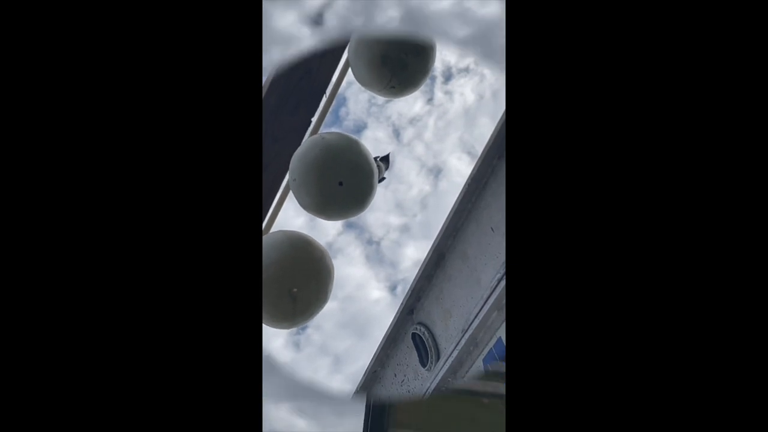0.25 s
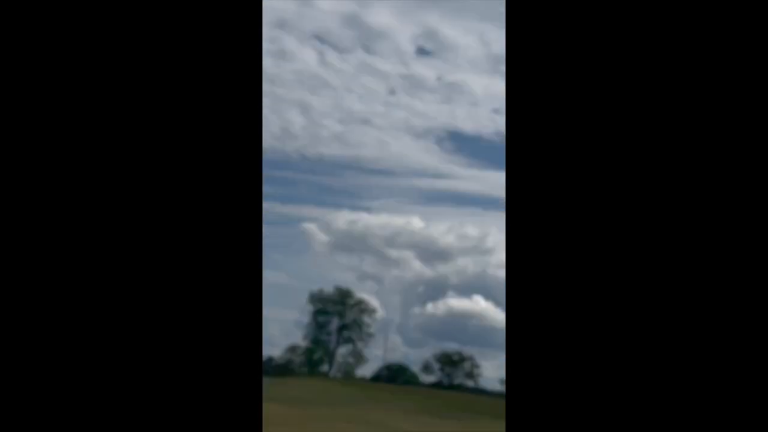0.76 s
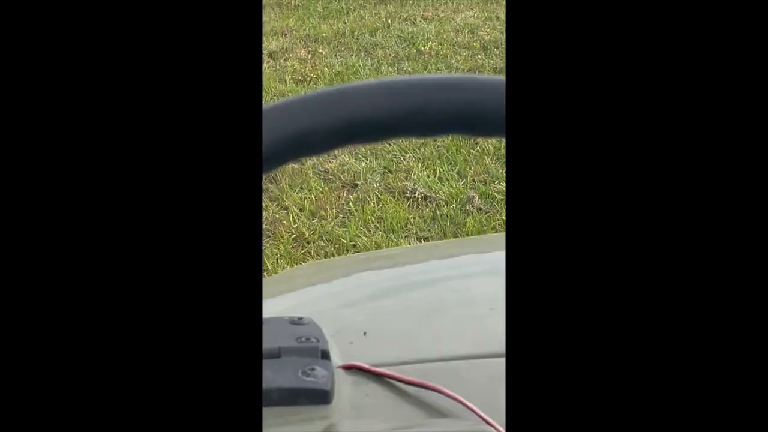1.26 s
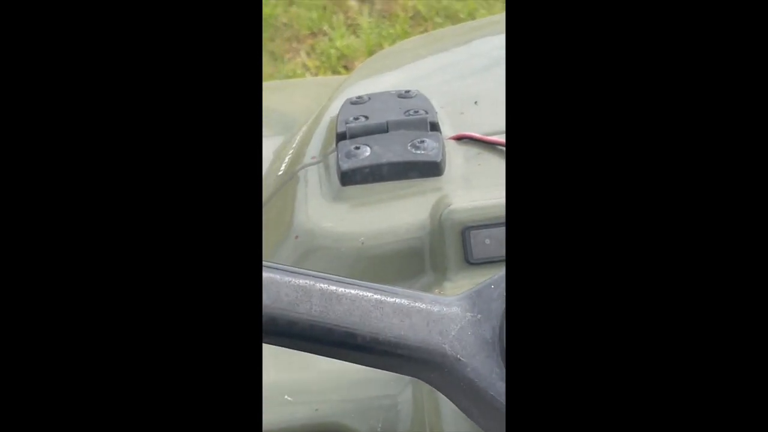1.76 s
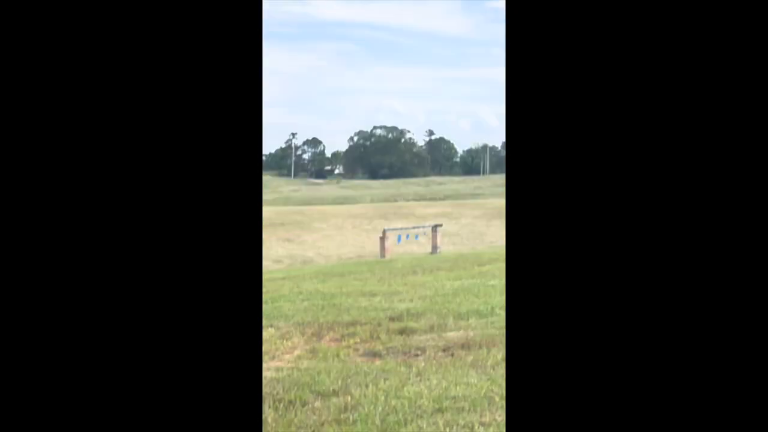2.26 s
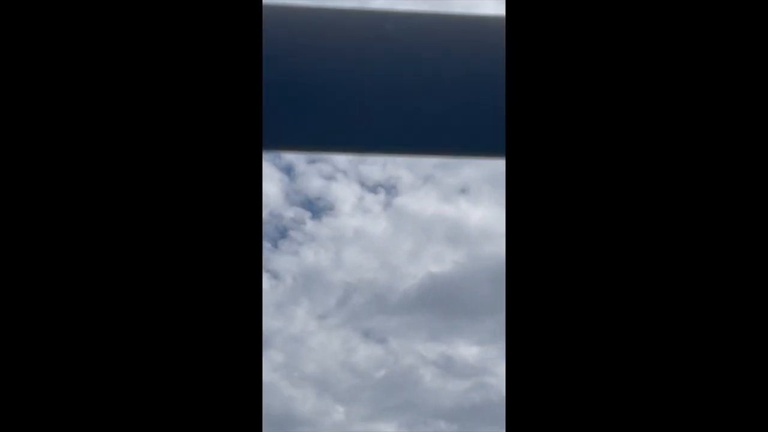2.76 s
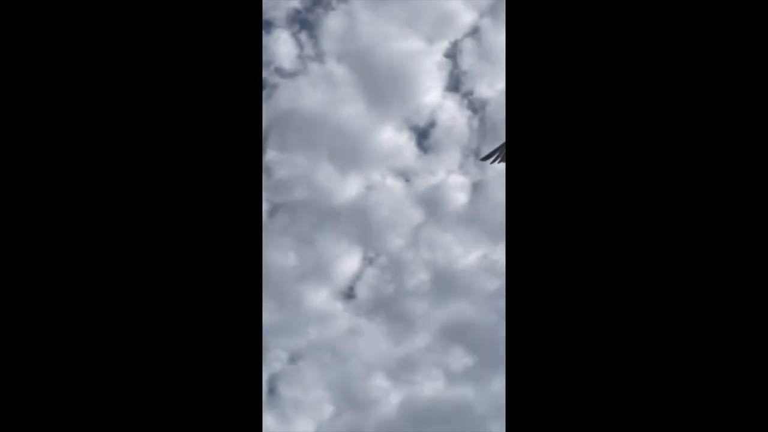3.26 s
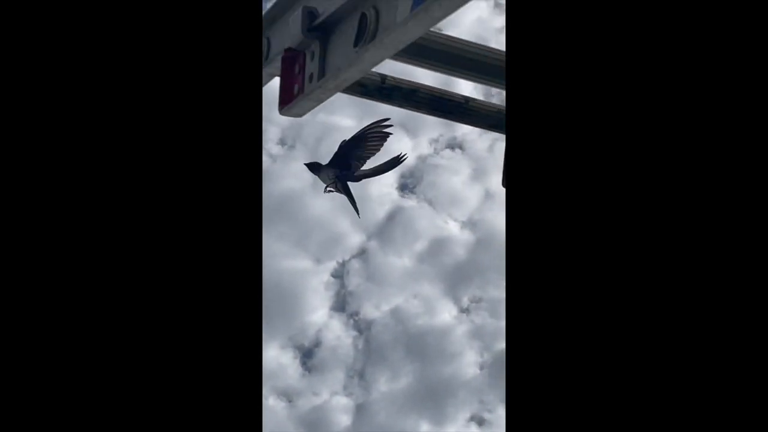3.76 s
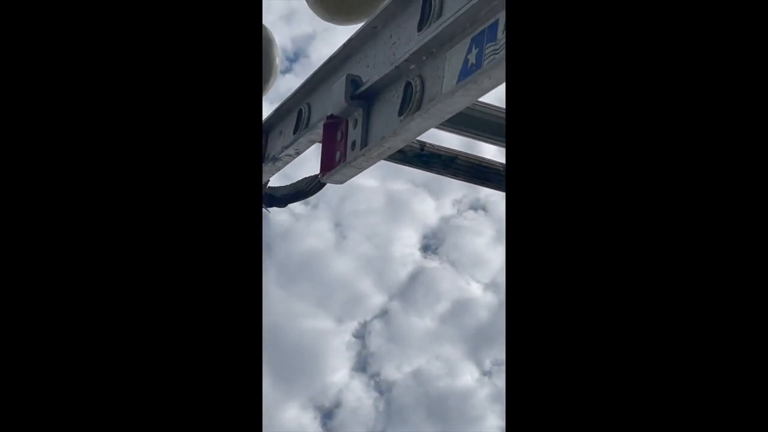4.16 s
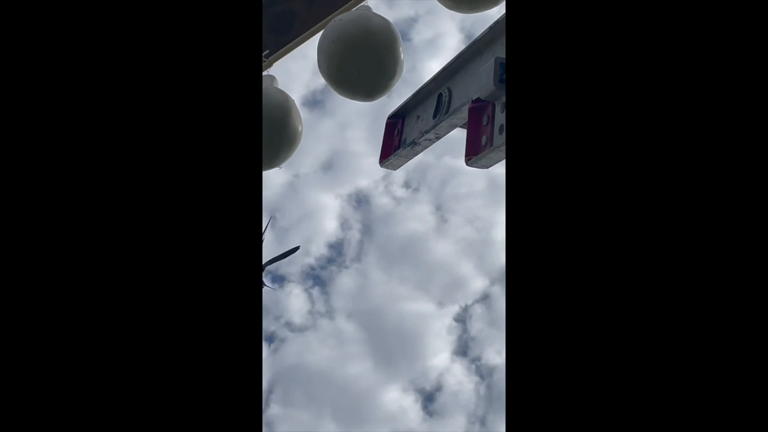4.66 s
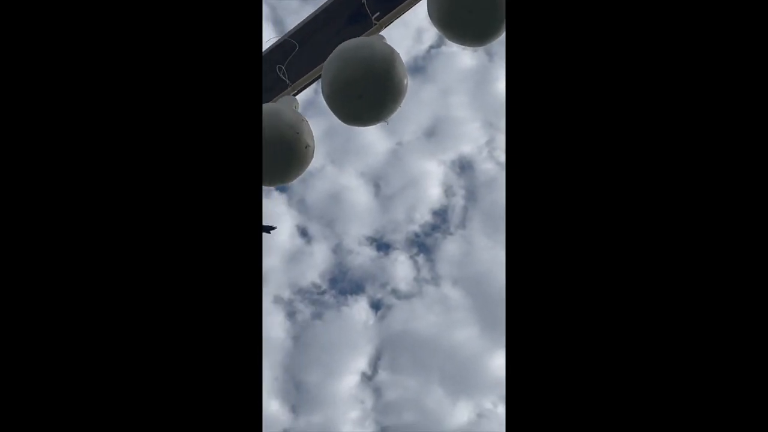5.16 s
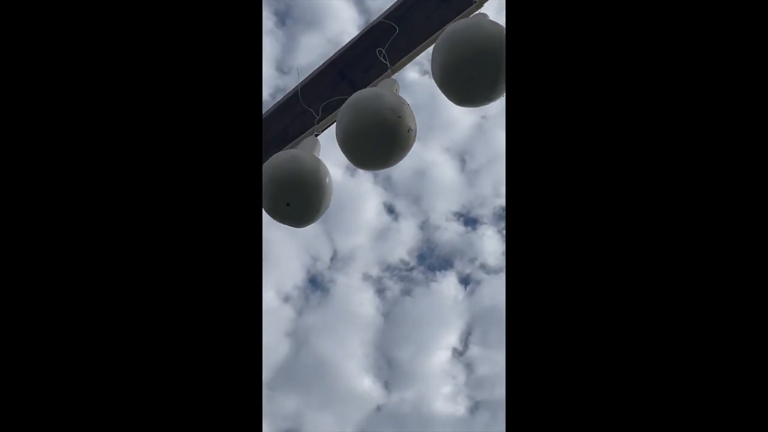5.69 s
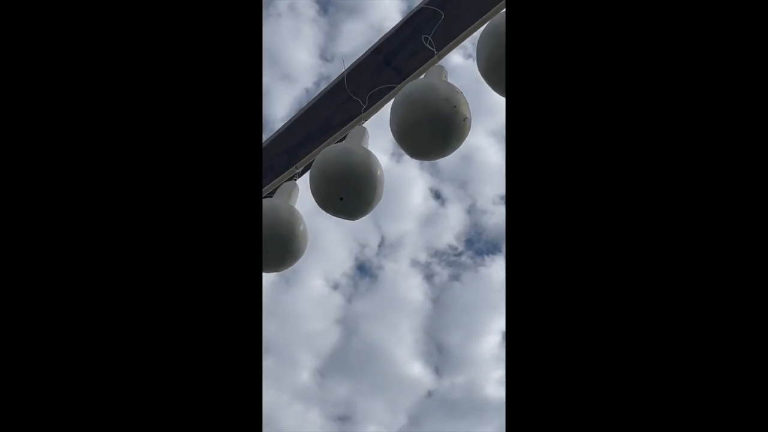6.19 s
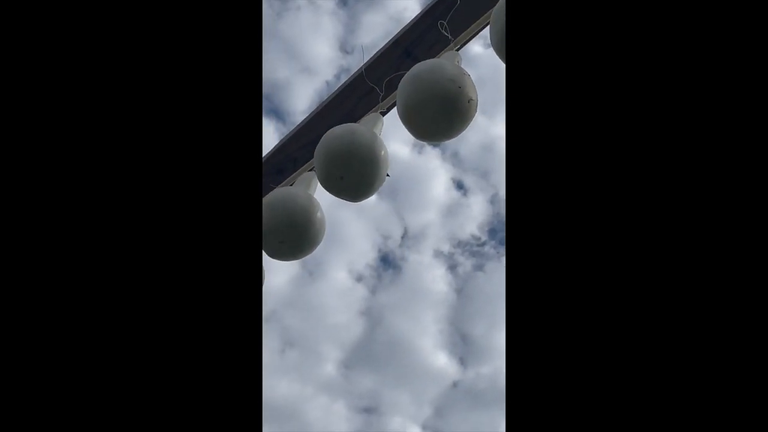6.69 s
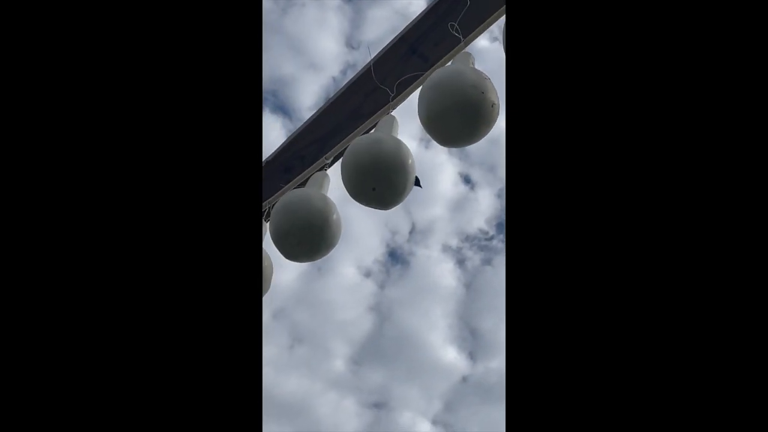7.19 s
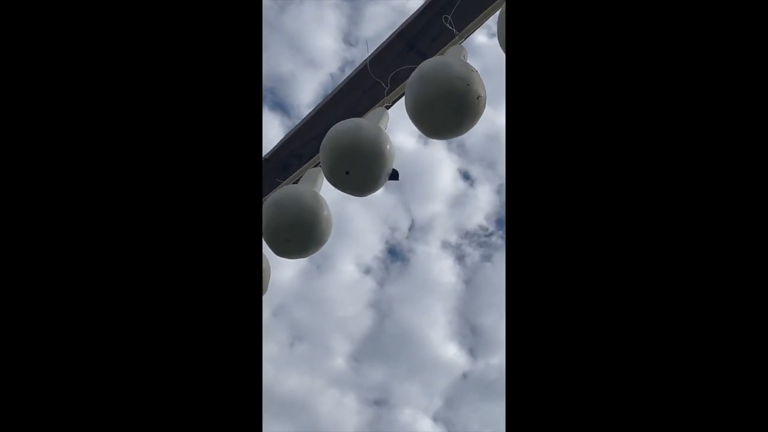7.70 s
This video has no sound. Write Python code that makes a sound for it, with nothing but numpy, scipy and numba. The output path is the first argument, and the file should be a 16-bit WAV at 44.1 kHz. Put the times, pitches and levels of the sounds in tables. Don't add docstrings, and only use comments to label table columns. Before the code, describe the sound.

Outdoors in an open field, martins near hanging nest gourds give short, burry falling chirps, spaced apart, then two loud sharper calls around three and four seconds. After a pause, liquid gurgling runs tumble down near six and a half seconds. A high katydid rasp and soft hush continue throughout. A handheld phone picks up low wind rumble, thumps and little ticks, with wind strongest at the end.

```python
import sys
import numpy as np
from scipy import signal
from scipy.fft import rfft, irfft
from scipy.io import wavfile
from scipy.ndimage import uniform_filter1d
from numba import njit

SR = 44100
rng = np.random.default_rng(int(sys.argv[2]) if len(sys.argv) > 2 else 0)


def voltage_ratio(decibels):
    exponent = np.asarray(decibels, float) / 20
    return 10 ** exponent


def store_pcm(level_fs):
    pcm = np.round(np.clip(level_fs, -1, 1) * 32767).astype(np.int16)
    wavfile.write(sys.argv[1], SR, np.atleast_2d(pcm).T)


N = 350154
T = np.arange(N) / SR


@njit
def svf(x, hz, width):
    y, band, low = np.empty(len(x)), 0., 0.
    for i in range(len(x)):
        g, k = np.tan(np.pi * hz[i] / SR), width / hz[i]
        v = (band + g * (x[i] - low)) / (1 + g * (g + k))
        band, low, y[i] = 2 * v - band, low + 2 * g * v, k * v
    return y


def unit(x):
    return x / np.sqrt(np.mean(x ** 2))


def walk(rate, size=N):
    hold = int(SR / rate)
    steps = np.repeat(rng.standard_normal(size // hold + 1), hold)
    return 1.596 * uniform_filter1d(uniform_filter1d(steps, hold), hold)[:size]


def on_log_hz(table, hz):
    f, value = np.transpose(table)
    return np.interp(np.log(hz + 1), np.log(f + 1), value)


def gusty(colour, centres_hz, flicker_db, flicker_hz):
    out = 0
    for hz in centres_hz:
        band = rng.standard_normal(N)
        for _ in range(2):
            band = svf(band, np.full(N, hz), hz / 2)
        level_db = on_log_hz(colour, hz) + flicker_db * walk(flicker_hz)
        out = out + voltage_ratio(level_db) * band
    return unit(out)


def throat(hz, width_hz):
    centre = np.full(N, hz)
    return unit(svf(svf(rng.standard_normal(N), centre, width_hz), centre, width_hz))


def field(colour):
    # start_s, level_db
    hush_level = [
        (0.0, -67),
        (0.35, -66.5),
        (0.77, -57.5),
        (1.48, -63),
        (2.99, -61),
        (4.62, -65),
        (5.84, -65),
        (7.94, -65.5),
    ]
    hush = gusty(colour, 250 * 2 ** np.arange(0, 6.1, .5), flicker_db=1.7, flicker_hz=9)
    return voltage_ratio(np.interp(T, *np.transpose(hush_level))) * hush


def truck():
    # start_s, engine_hz, engine_db, tyre_hz, tyre_db
    drone = [
        (3.1, 90, -79, 235.5, -56.5),
        (3.45, 90.5, -54, 247, -54.5),
        (3.8, 92.7, -52.5, 223, -52),
        (4.201, 91.2, -41, 223, -58.5),
        (4.499, 87.2, -58.5, 209, -69),
    ]
    s, *columns = np.transpose(drone)
    engine_hz, engine_db, tyre_hz, tyre_db = (np.interp(T, s, c) for c in columns)
    width_hz = 25.
    engine = unit(svf(svf(rng.standard_normal(N), engine_hz, width_hz), engine_hz, width_hz))
    tyres = unit(svf(svf(rng.standard_normal(N), tyre_hz, width_hz), tyre_hz, width_hz))
    present = (T > s[0]) & (T < s[-1])
    return present * (voltage_ratio(engine_db) * engine + voltage_ratio(tyre_db) * tyres)


def wind():
    # start_s, rumble_db, flutter_db (over a breeze)
    strength = [(0.0, -52, 2), (.45, -49.5, -2.5), (.9, -46, 2), (1.5, -50, -4), (2.2, -47, 3),
                (2.601, -42.5, -10), (2.899, -54, 5.5), (3.498, -57, 8), (4.2, -54.5, 3.5),
                (4.45, -47.5, -2), (4.6, -58.5, 4.5), (5.049, -55, 4), (5.249, -39, -4.5),
                (5.8, -47.5, -1.5), (6.0, -53.5, -0.5), (6.12, -50, 5), (7.0, -41, 4.5), (7.94, -38, 6.5)]
    # start_s, rise_db (over the wind), length_s
    gusts = [(0.534, 9.5, 0.012), (0.65, 10.5, 0.089), (1.033, 0, 0.054), (2.319, 8.5, 0.071),
             (2.547, 10.5, 0.062), (2.667, 15.5, 0.035), (2.822, 11, 0.042), (3.114, -9, 0.051),
             (3.221, 15, 0.012), (3.468, 1, 0.053), (4.216, -0.5, 0.032), (4.462, 6, 0.025),
             (4.908, 17, 0.016), (5.212, 0, 0.058), (5.656, 3.5, 0.023), (5.763, 8, 0.12),
             (6.157, 10.5, 0.078), (6.512, 10.5, 0.018), (6.642, 8.5, 0.045), (6.82, 4.5, 0.029),
             (7.363, 4.5, 0.019), (7.643, 7, 0.022), (7.824, 7.5, 0.019), (7.921, -12.5, 0.09)]
    # pitch_hz, density_db (per Hz)
    rumble_colour = [(25, -5.5), (45, 0.5), (75, 5.5), (120, -5.5), (170, -33.5)]
    # pitch_hz, density_db (per Hz)
    flutter_colour = [(120, 3), (180, 6.5), (260, 5.5), (370, -12), (520, -33)]
    s, rumble_db, flutter_db = np.transpose(strength)
    rumble_db = np.interp(T, s, rumble_db)
    rumble_db = rumble_db + sum(db * np.exp(-((T - at) / span) ** 2) for at, db, span in gusts)
    flutter_db = np.interp(T, s, flutter_db) - 57 + .45 * (rumble_db + 44.5)
    rumble = gusty(rumble_colour, 30 * 2 ** np.arange(0, 2.6, .5), flicker_db=0.7, flicker_hz=15)
    flutter = gusty(flutter_colour, 140 * 2 ** np.arange(0, 2.1, .5), flicker_db=3., flicker_hz=30)
    return voltage_ratio(rumble_db) * rumble + voltage_ratio(flutter_db + 2.65 * walk(26)) * flutter


def eddies():
    # start_s, peak_db, pitch_hz
    small_eddies = [(2.307, -39.5, 300), (2.566, -35, 221), (2.653, -30, 181), (3.094, -42, 177),
                    (4.801, -46, 250), (5.202, -52, 177.4), (6.226, -37, 218), (6.495, -30.5, 209),
                    (6.52, -30, 266), (6.599, -32.5, 176), (6.632, -34, 237), (6.713, -37, 232),
                    (6.912, -33, 238), (6.955, -33.5, 320), (7.097, -29, 320), (7.039, -42, 295),
                    (7.405, -43, 327), (7.441, -37.5, 324), (7.588, -38.5, 388), (5.149, -44.5, 198),
                    (7.176, -27.5, 307), (7.319, -39, 195), (7.365, -31, 300), (7.469, -38, 230.4),
                    (7.537, -24.5, 185), (7.615, -37, 193.5), (7.665, -31, 185), (7.746, -44, 303),
                    (7.821, -20.5, 240)]
    # start_s, peak_db, pitch_hz
    thumps = [
        (0.528, -31, 66),
        (0.672, -21, 77.5),
        (2.564, -34, 52.7),
        (2.571, -21, 72),
        (3.092, -34, 108),
        (5.214, -26.5, 106),
        (5.635, -25.5, 56.7),
        (6.505, -30, 80.4),
        (6.853, -30, 66.5),
        (7.325, -24.5, 108),
    ]
    cycles = 1.053
    out = np.zeros(N)
    for s, db, hz in small_eddies + thumps:
        turns = (T - s) * hz - cycles
        out += voltage_ratio(db) * np.exp(-(turns / (0.6 * cycles)) ** 2) * np.sin(2 * np.pi * turns)
    return out


def ticks():
    # start_s, peak_db, ring_hz, decay_s (to -60 dB)
    strikes = [(.296, -55, 2770, 0.078), (.824, -47, 3870, 0.029), (1.77, -52, 3970, .07),
               (2.758, -47.5, 3290, 0.021), (4.092, -48.5, 3333, 0.045), (6.737, -54, 2310, 0.029),
               (1.183, -57.5, 3550, 0.045), (2.307, -41.5, 496, 0.025), (3.359, -47, 860, 0.015),
               (4.565, -56, 680, 0.036), (.95, -51.5, 576, 0.57), (5.474, -64.5, 2130, 1),
               (4.794, -49, 2450, 0.072), (4.794, -48, 5500, 0.078), (4.797, -52.5, 890, 0.037),
               (4.799, -47.5, 270.6, 0.146), (5.044, -60, 2820, 0.046), (5.2, -51, 567, 0.063),
               (5.283, -54.5, 580, 0.053), (5.364, -43.5, 2010, 0.045), (5.566, -53, 3634, 0.049),
               (5.597, -55, 3990, 0.12), (7.852, -54, 3060, 0.057)]
    out, t = np.zeros(N), np.arange(16384) / SR
    for s, db, hz, t60 in strikes:
        noise = rng.standard_normal(len(t))
        centre, width = np.full(len(t), 1. * hz), hz * (.3 + (hz / 4500) ** 2)
        skirt = unit(svf(svf(noise, centre, width), centre, width))
        knock = 3. * np.exp(-hz / 2500.) * (t60 < .2) * np.sin(2 * np.pi * hz * t)
        decay = np.exp(-np.log(1000) * t / t60) * np.minimum(t / (0.0055 * t60), 1)
        i = int(s * SR)
        out[i:i + len(t)] += voltage_ratio(db) * ((skirt + knock) * decay)[:N - i]
    return out


def thin_hiss():
    # start_s, level_db
    hiss_level = [
        (0, -102),
        (2.9, -102),
        (3.05, -87),
        (5.0, -87),
        (5.65, -89),
        (5.75, -102),
        (7.94, -102),
    ]
    hiss = unit(throat(15500., 500.) + .35 * throat(12400., 1400.))
    return voltage_ratio(np.interp(T, *np.transpose(hiss_level)) + 4 * walk(14)) * hiss


def katydid():
    # start_s, level_db, chorus_db (blurred chorus over the near insect)
    rasp_level = [
        (0.0, -62.5, -0.5),
        (0.31, -64, 3.5),
        (0.71, -59.5, 2),
        (1.189, -62.5, 2.5),
        (3.65, -60.5, 4.5),
        (3.821, -63, 0),
        (7.58, -62, -0.5),
        (7.94, -63.5, 0),
    ]
    phase = (66.2 * T + .03 * walk(6) + .5) % 1
    hz = 8900 + 2150 * np.sin(np.pi * phase ** 1.35)
    file_tone = np.sin(2 * np.pi * np.cumsum(hz) / SR)
    teeth = file_tone + .6 * unit(svf(rng.standard_normal(N), hz, 500))
    pressure = np.exp(-((phase - .54) / .17) ** 2) + .35 * np.sin(np.pi * phase)
    stroke = unit(teeth * pressure)
    chorus = unit(svf(rng.standard_normal(N), np.full(N, 9600.), 1200.0))
    wings = signal.ellip(6, 1, 60, [8350, 11250], "bandpass", fs=SR, output="sos")
    s, db, chorus_db = np.transpose(rasp_level)
    share = voltage_ratio(np.interp(T, s, chorus_db))
    rasp = signal.sosfilt(wings, (stroke + share * chorus) / np.hypot(1, share))
    return unit(rasp) * voltage_ratio(np.interp(T, s, db))


def peeps():
    # start_s, length_s, pitch_hz, level_db
    whistles = [
        (5.84, .05, 4080, -67),
        (6.2, .07, 4280, -62),
        (6.305, .055, 4330, -64),
        (6.39, .05, 4350, -67),
    ]
    out = np.zeros(N)
    for s, span, hz, db in whistles:
        swell = np.sin(np.pi * np.clip((T - s) / span, 0, 1))
        out += voltage_ratio(db) * swell * np.sin(2 * np.pi * hz * T)
    return out


def gurgles():
    # start_s, length_s, start_hz, end_hz, level_db
    side_a = [(5.891, 0.038, 5530, 4290, -58.5), (5.932, 0.026, 4000, 2940, -67),
              (5.959, 0.024, 2400, 2250, -50.5), (6.039, 0.032, 2620, 2450, -63.5),
              (6.067, .012, 2480, 2140, -59), (6.078, 0.018, 2060, 2090, -57),
              (6.099, 0.016, 2220, 2340, -55), (6.119, 0.015, 2360, 2280, -61),
              (6.213, 0.022, 3270, 2740, -52.5), (6.262, 0.026, 2422, 2096, -36.5),
              (6.309, 0.033, 2170, 1880, -47.5), (6.364, 0.014, 2320, 2165, -55),
              (6.488, 0.027, 3500, 2670, -39.5), (6.541, 0.03, 2412, 2013, -38),
              (6.58, 0.038, 2216, 1906, -47), (6.623, .018, 2080, 2155, -56),
              (6.762, 0.028, 4330, 3114, -37), (6.789, 0.024, 3020, 2070, -37.5),
              (6.825, 0.05, 2210, 1840, -43.5), (6.861, 0.074, 1970, 2080, -53.5)]
    # start_s, length_s, start_hz, end_hz, level_db
    side_b = [(1.757, .016, 2580, 3050, -49), (5.903, 0.033, 2490, 1920, -65.5),
              (5.974, 0.022, 3080, 2700, -59), (6.013, 0.02, 2280, 2220, -62),
              (6.03, .014, 2900, 2800, -65.5), (6.239, 0.018, 3120, 2730, -44.5),
              (6.28, 0.015, 2960, 2740, -53.5), (6.298, 0.022, 2300, 2370, -48),
              (6.322, 0.046, 2700, 2370, -55.5), (6.51, 0.036, 3550, 2610, -36.5),
              (6.549, 0.05, 2950, 2430, -46), (6.598, .046, 2780, 2460, -52.5),
              (6.804, 0.033, 3065, 2530, -37.5), (6.838, 0.023, 2534, 2720, -46.5),
              (6.855, .045, 2720, 2396, -45.5), (6.899, 0.029, 2420, 2520, -53)]
    # start_s, length_s, start_hz, end_hz, level_db
    strands = [(5.928, .012, 5950, 5650, -65), (5.98, 0.012, 5950, 5560, -69),
               (6.002, 0.013, 5350, 5200, -67), (6.048, 0.019, 5230, 5080, -68.5),
               (6.226, .013, 5500, 5150, -58), (6.242, .012, 6160, 5850, -54),
               (6.288, 0.036, 5320, 5000, -58), (6.317, .022, 6100, 5650, -63),
               (6.331, 0.037, 5130, 4860, -59), (6.3, .012, 3750, 3700, -63.5),
               (6.326, .016, 3730, 3500, -59), (6.788, .026, 6000, 4380, -52),
               (6.822, 0.063, 4800, 4500, -58), (6.847, .065, 5250, 4830, -58)]
    bend = 1.3
    sides, overtones, effort = np.zeros((3, N)), np.zeros(N), np.zeros(N)
    for side, strokes in zip(sides, (side_a, side_b, strands)):
        for s, span, start_hz, end_hz, db in strokes:
            at = np.arange(int(s * SR), int((s + span) * SR))
            u = np.linspace(0, 1, len(at))
            hz = start_hz + (end_hz - start_hz) * (1 - np.exp(-bend * u)) / (1 - np.exp(-bend))
            p = 2 * np.pi * np.cumsum(hz + 25 * walk(150, len(at))) / SR
            gain = np.sqrt(2) * voltage_ratio(db + 2.6 * walk(205, len(at))) * np.abs(np.sin(np.pi * u)) ** .5
            side[at] += gain * np.sin(p)
            octave = voltage_ratio(-14) / (1 + ((2 * hz - 5500) / 980) ** 2)
            overtones[at] += gain * octave * np.sin(2 * p)
            overtones[at] += gain * voltage_ratio(-38.5) * np.sin(4 * p) * (hz > 2800) * (hz < 3600)
            effort[at] += gain
    rasp = unit(throat(3250.0, 970.0) + .5 * throat(5100.0, 1300.0) + .1 * throat(12900., 1200.))
    airflow = np.sqrt(0.018 * np.abs(uniform_filter1d(effort, size=1600)))
    rasp *= voltage_ratio(-22.5 + 2.3 * walk(90)) * airflow
    mixed = voltage_ratio(22) * sides[0] * sides[1]
    return sides.sum(axis=0) + overtones + mixed + rasp


def note(row, scoop_hz, scoop_s, sag, attack_db, attack_s, swell_db, release_db, release_s, step_hz=0, step_at=1):
    s, span, top_hz, end_hz, db = row
    at = np.arange(int(s * SR), int((s + span) * SR))
    t = (at - at[0]) / SR
    u = t / span
    hz = top_hz - scoop_hz * np.exp(-t / scoop_s) - (top_hz - end_hz) * u ** sag
    hz = hz - step_hz / (1 + np.exp((step_at - u) / .06))
    db = db - attack_db * np.exp(-t / attack_s) - swell_db * (1 - u)
    db = db - release_db * np.exp((t - span) / release_s)
    edge = np.minimum(np.minimum(t, (span - t) / 4) / .002, 1)
    return at, np.sqrt(2) * edge * voltage_ratio(db), hz, u


def chirps():
    # start_s, length_s, top_hz, end_hz, level_db
    rolling = [
        (0.006, .162, 3710, 2633, -36.5),
        (0.311, .16, 3785, 2646, -29),
    ]
    # start_s, length_s, top_hz, end_hz, level_db
    level = [
        (0.822, 0.17, 3506, 2540, -27),
        (1.769, 0.158, 3532, 2580, -31.5),
        (2.15, 0.17, 3266, 2360, -29.5),
    ]
    # start_s, length_s, top_hz, end_hz, level_db
    sharp = [
        (2.772, 0.13, 3907, 3710, -20),
        (4.109, 0.13, 3983, 3720, -18),
    ]
    # start_s, length_s, top_hz, end_hz, level_db
    split = [
        (0.683, .092, 4110, 3520, -29.5),
        (1.603, 0.085, 4150, 3610, -29.5),
    ]
    # start_s, length_s, top_hz, end_hz, level_db
    under_split = [
        (0.708, 0.07, 3388, 2866, -30),
        (1.626, 0.076, 3444, 2830, -29.5),
    ]
    # start_s, length_s, top_hz, end_hz, level_db
    under_sharp = [
        (2.785, .115, 2987, 2173, -38),
        (4.135, .105, 2920, 2213, -33),
    ]
    shapes = dict( rolling=dict(scoop_hz=835, scoop_s=0.018, sag=1.7, attack_db=11, attack_s=0.011, swell_db=7.5, release_db=15, release_s=0.0049),
              level=dict(scoop_hz=675, scoop_s=0.0036, sag=3.9, attack_db=24, attack_s=0.0079, swell_db=1, release_db=21.5, release_s=0.014),
              sharp=dict(scoop_hz=150.3, scoop_s=.012, sag=2.1, step_hz=256, step_at=.5, attack_db=8, attack_s=0.033, swell_db=-4, release_db=23, release_s=0.016),
              split=dict(scoop_hz=350, scoop_s=0.013, sag=2.6, attack_db=13.5, attack_s=0.018, swell_db=0.36, release_db=12.5, release_s=0.037),
              under_split=dict(scoop_hz=26, scoop_s=0.0077, sag=0.5, attack_db=6.5, attack_s=0.015, swell_db=11.5, release_db=16, release_s=0.0073),
              under_sharp=dict(scoop_hz=30, scoop_s=0.023, sag=2.3, attack_db=10, attack_s=.011, swell_db=8.5, release_db=18, release_s=0.011))
    # trill_depth (radians), second_db, third_db (overtones), breath_db
    tones = dict(rolling=[(0.92, -13.5, -22, -23.5), (1.0, -31, -44, -32.5)],
             level=[(1.4, -22.5, -22, -32.5), (.85, -31, -39.5, -39)], sharp=[(2, -26, -23.5, -44),
             (0.77, -33.5, -28, -31)], split=[(1.4, -23, -16.5, -27), (1.4, -28, -18, -40)])
    # pulsing (0-1), sum_tone_db, rasp_db
    undertones = dict(under_split=(.5, -17, -25), under_sharp=(.7, -10, -10))
    trill_hz = 151
    out, trill, upper = np.zeros(N), np.zeros(N), np.zeros(N)
    air = throat(2500., 1300.)
    rasp = unit(throat(6200., 1500.0) + throat(4700., 900.) + .6 * throat(2200., 1200.))
    for kind, rows in dict(rolling=rolling, level=level, sharp=sharp, split=split).items():
        for row in rows:
            at, gain, hz, u = note(row, **shapes[kind])
            n = len(at)
            depth, second_db, third_db, breath_db = (a + (b - a) * u for a, b in zip(*tones[kind]))
            depth = depth[-1] + (depth[0] - depth[-1]) * np.exp(-u / .22)
            hz = hz + 22 * walk(45, n)
            trill[at] = 2 * np.pi * np.cumsum(trill_hz * (1 + .09 * walk(54, n))) / SR
            wobble = depth * trill_hz * (1 + 0.21 * walk(80, n)) * np.sin(trill[at])
            upper[at] = p = 2 * np.pi * np.cumsum(hz + wobble) / SR
            gain = gain * (1 + .22 * (1 + .5 * walk(43, n)) * np.sin(trill[at] + 2.0))
            gain = gain * voltage_ratio(1.6 * walk(247.9, n))
            shaky = p + .55 * walk(790, n)
            fourth = np.sin(4 * shaky) * np.clip((hz - 3500) / 200, 0, 1)
            fifth = np.sin(5 * shaky) * np.clip((3400 - hz) / 200, 0, 1)
            voice = np.sin(p) + voltage_ratio(second_db) * np.sin(2 * shaky) + voltage_ratio(third_db) * np.sin(3 * shaky)
            out[at] += gain * (voice + voltage_ratio(-33) * (fourth + fifth) + voltage_ratio(breath_db) * air[at])
    for kind, rows in dict(under_split=under_split, under_sharp=under_sharp).items():
        pulsing, sum_db, harsh_db = undertones[kind]
        for row in rows:
            at, gain, hz, _ = note(row, **shapes[kind])
            wobble = pulsing * 240 * np.sin(trill[at] + 5.1) + 70 * walk(330, len(at))
            q = 2 * np.pi * np.cumsum(hz + wobble) / SR
            gain = gain * (1 + pulsing * np.sin(trill[at] + 3.8))
            sums = np.sin(q + upper[at]) + 0.2 * np.sin(q + 2 * upper[at])
            mixed = voltage_ratio(sum_db) * np.sqrt(gain.max() / (gain + .05 * gain.max())) * sums
            out[at] += gain * (np.sin(q) + mixed + voltage_ratio(harsh_db) * rasp[at])
    return out


def echoes(x, send):
    t = np.arange(int(.7 * SR)) / SR
    noise = rng.standard_normal(len(t)) + 0.51 * rng.standard_normal((2, len(t)))
    near = voltage_ratio(-25) * np.exp(-t / 0.008) * (t > .002) * (rng.random(len(t)) < .03)
    trees = voltage_ratio(-90.0) * np.exp(-((t - .24) / 0.12) ** 2) + voltage_ratio(-75.0) * np.exp(-t / 0.16)
    early = signal.fftconvolve(x[None], noise * near, axes=1)[:, :N]
    late = signal.fftconvolve((x * send)[None], noise * trees, axes=1)[:, :N]
    return early + late


def scene():
    # pitch_hz, density_db (per Hz)
    shared_colour = [(250, -4), (900, 1), (1400, -3), (2400, -2.5), (3700, -9.5), (5200, -19),
                     (7000, -29.5), (13000, -46.5)]
    # pitch_hz, density_db (per Hz)
    apart_colour = [(250, 1.5), (500, 8.5), (900, 1), (1400, -1.5), (2400, -8), (3700, -28), (7000, -33),
                    (12000, -50.5)]
    # pitch_hz, left_lead (radians)
    port_phase = [(1600, 0), (2600, .85), (4400, .85), (5500, .2), (7000, 2.9), (10600, 6.2), (12500, 6.9),
                  (15600, 10.8)]
    birds = chirps() + gurgles() + peeps()
    perched = np.where(T < 2.5, voltage_ratio(7.), 1)
    shared = birds + katydid() + thin_hiss() + ticks() + wind() + eddies() + truck() + field(shared_colour)
    lead = on_log_hz(port_phase, np.fft.rfftfreq(N, 1 / SR))
    ports = irfft(rfft(shared) * np.exp(.5j * np.outer([1, -1], lead)), N)
    apart = voltage_ratio(-4) * field(apart_colour) + voltage_ratio(-15.5) * wind() + voltage_ratio(-13) * katydid()
    return ports + echoes(birds, perched) + np.outer([1, -1], apart)


def gapped(x):
    # low_hz, high_hz
    faint_hz = [4350, 5150]
    # low_hz, high_hz
    loud_hz = [2700, 4100]
    faint = signal.sosfiltfilt(signal.butter(6, faint_hz, "bandpass", fs=SR, output="sos"), x)
    loud = signal.sosfiltfilt(signal.butter(6, loud_hz, "bandpass", fs=SR, output="sos"), x)
    faint_power, loud_power = (uniform_filter1d(np.sum(v ** 2, axis=0), size=1024) for v in (faint, loud))
    silenced = 1. * (faint_power < loud_power * voltage_ratio(2 * -32))
    return x - faint * uniform_filter1d(silenced, size=400)


def roll_off(x):
    return signal.sosfilt(signal.butter(12, 15850, fs=SR, output="sos"), x)


def record(dry):
    # pitch_hz, gain_db
    capsule = [(1000, 0.5), (11000, -4), (13000, -4.5), (14200, -14.5), (15000, 3), (15800, -1)]
    x = signal.sosfilt(signal.butter(3, 38, "highpass", fs=SR, output="sos"), dry)
    x = irfft(rfft(x) * voltage_ratio(on_log_hz(capsule, np.fft.rfftfreq(N, 1 / SR))), N)
    mix = gapped(x)
    return roll_off(mix)


dry = scene()
out = record(dry)
store_pcm(out)
```